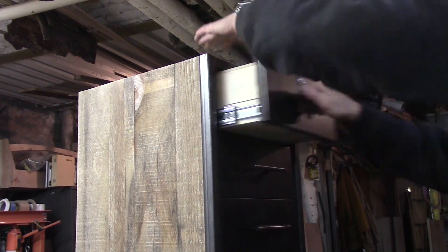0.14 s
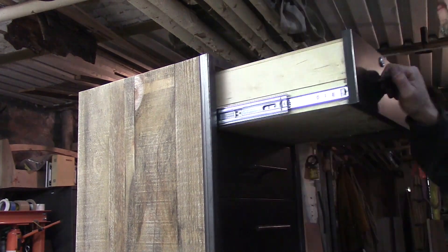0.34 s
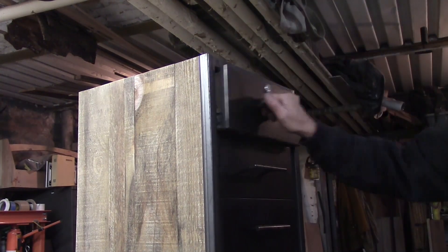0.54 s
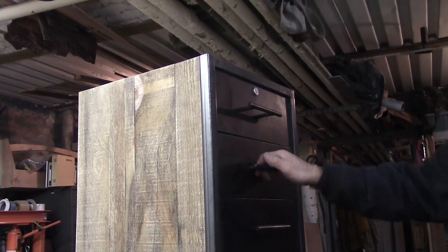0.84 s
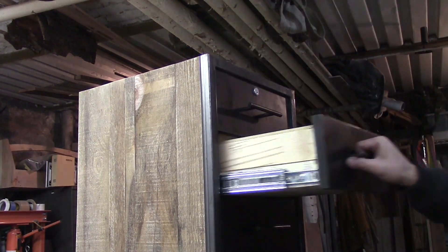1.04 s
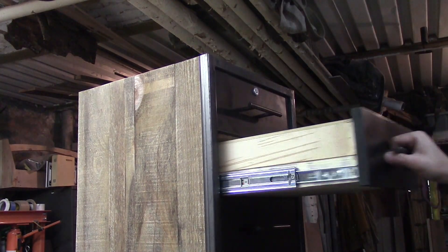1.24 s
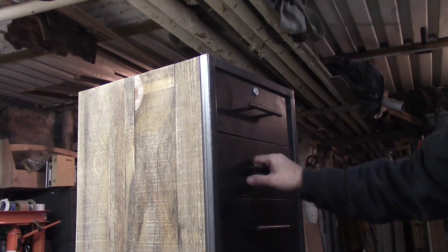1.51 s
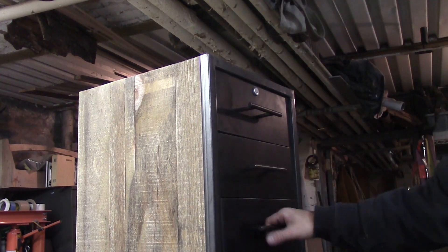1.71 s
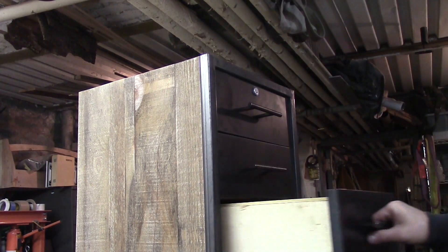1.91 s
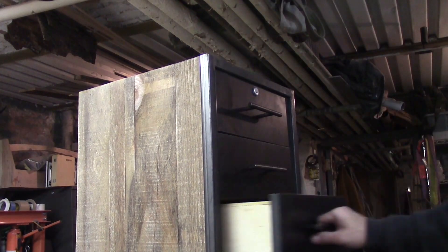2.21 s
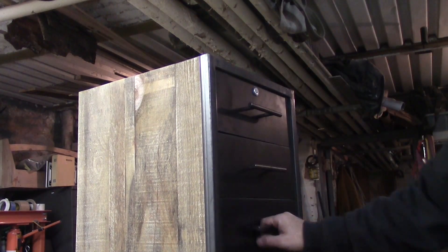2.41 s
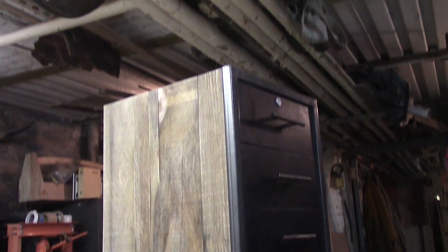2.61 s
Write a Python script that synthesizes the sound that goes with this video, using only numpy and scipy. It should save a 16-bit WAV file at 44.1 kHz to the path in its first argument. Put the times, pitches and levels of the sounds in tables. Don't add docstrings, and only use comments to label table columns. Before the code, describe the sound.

Close-up drawer sliding on metal ball runners: rattly whirr out, click, whirr back, hollow wooden slam, repeated three times with faint hand brushes between, over low shop noise, ending suddenly in duller, quieter room air.

```python
import sys
import numpy as np
from scipy import signal
from scipy.io import wavfile
from scipy.ndimage import uniform_filter1d

SR = 44100
rng = np.random.default_rng(int(sys.argv[2]) if len(sys.argv) > 2 else 0)


def linear_from_db(decibels):
    return 10 ** (np.asarray(decibels, float) / 20)


def store_pcm(level_fs):
    pcm = np.round(np.clip(level_fs, -1, 1) * 32767).astype(np.int16)
    wavfile.write(sys.argv[1], SR, np.atleast_2d(pcm).T)


N = 121275
T = np.arange(N) / SR
BAND_EDGES_HZ = np.geomspace(40, 16800, 23)
BAND_HZ = np.sqrt(BAND_EDGES_HZ[1:] * BAND_EDGES_HZ[:-1])

# start_s, level_db
SLAMS = [
    (0.0, -40.5),
    (0.209, -35.5),
    (0.683, -32.5),
    (1.584, -23),
    (2.091, -43.5),
    (2.461, -25.5),
]
# pitch_hz, level_db per Hz
SHOP = [(30, -26), (100, -17), (320, 0), (1100, -7), (3100, -14), (8000, -24), (16000, -29)]
# pitch_hz, level_db per Hz
CORNER = [(18, -44), (30, -22), (98, -5), (227, -9), (364, -15.5), (600, -14.5), (721, -21), (2750, -29.5),
          (16000, -61)]
SHOP_DB, CORNER_DB = -48.5, -53.5
THUD_RISE_S = 0.0038


def rms_one(x):
    return x / np.sqrt(np.mean(x ** 2) + 1e-20)


def at_hz(points, hz):
    curve_hz, curve_db = np.transpose(points)
    return np.interp(np.log(hz), np.log(curve_hz), curve_db)


def drift(rate_hz):
    r = np.exp(-80 * np.pi * rate_hz / SR)
    noise = rng.standard_normal(N // 40 + 2002)
    slow = signal.lfilter([1], [1, -2 * r, r * r], noise)[2000:]
    return np.interp(np.arange(N) / 40, np.arange(len(slow)), rms_one(slow))


def bank(sources):
    bands = []
    for k, (low, high) in enumerate(zip(BAND_EDGES_HZ, BAND_EDGES_HZ[1:])):
        band_filter = signal.butter(2, [low, high], "band", fs=SR, output="sos")
        bands.append(signal.sosfilt(band_filter, sources[k % 2]))
    return np.array(bands)


def unit_gains(spectrum):
    gains = linear_from_db(at_hz(spectrum, BAND_HZ))
    return gains / np.sqrt(np.sum(gains ** 2 * np.diff(BAND_EDGES_HZ)) / (SR / 2))


def resonance(x, hz, width_hz):
    r = np.exp(-np.pi * width_hz / SR)
    top_gain = np.array([1, 0, -1]) * (1 - r * r) / 2
    return signal.lfilter(top_gain, [1, -2 * r * np.cos(2 * np.pi * hz / SR), r * r], x)


def fading_tail(t, t60, linger_db):
    return linear_from_db(-60 * t / t60) + linear_from_db(linger_db - 60 * 0.25 * t / t60)


def struck(s, db, hz, t60, rise_s):
    out, i = np.zeros(N), int(s * SR)
    t = T[:min(N - i, int(2 * t60 * SR))]
    swell = 1 - np.exp(-(t / rise_s) ** 2)
    out[i:i + len(t)] = linear_from_db(db) * fading_tail(t, t60, -30) * swell * np.sin(2 * np.pi * hz * t)
    return out


def air(spectrum, db):
    return linear_from_db(db + 0.5 * drift(13)) * (unit_gains(spectrum) @ bank(rng.standard_normal((2, N))))


def duck():
    sink_db = np.zeros(N)
    for s, db in SLAMS:
        recovery = np.exp(-np.maximum(T - s, 0) / 0.78)
        sink_db += -1.5 * linear_from_db(db - SLAMS[3][1]) * (T > s) * recovery
    return linear_from_db(sink_db)


def quiet_corner():
    # start_s, level_db, pitch_hz, t60_s
    bump = (2.657, -33, 100, .09)
    s, db, hz, t60 = bump
    dull = signal.butter(6, 6040, fs=SR, output="sos")
    out = signal.sosfilt(dull, air(CORNER, CORNER_DB))
    out = out + struck(s, db, hz, t60, THUD_RISE_S)
    return out + struck(s, db - 9, 3.45 * hz, 0.041, 0.0011)


def hands(bands):
    # middle_s, width_s, level_db
    brushes = [
        (.81, 0.014, -53),
        (0.863, 0.017, -45),
        (1.75, 0.015, -57.5),
    ]
    shape = sum(linear_from_db(db) * np.exp(-.5 * ((T - s) / width) ** 2) for s, width, db in brushes)
    colour = unit_gains([(300, -7), (1500, -8), (5000, -4.0), (15000, -12.5)])
    return shape * linear_from_db(1.6 * drift(40)) * (colour @ bands)


def squeaks():
    # width_ms, level_db, pitch_hz
    squeak_shapes = [(4.1, -38.5, 10000), (10, -39.5, 10000), (2.5, -29, 11000), (5.1, -44, 12400),
                     (1.8, -49, 10000), (6.1, -29, 13000), (3.1, -33.5, 10000)]
    squeak_times = [1.016, 1.034, 1.402, 1.84, 2.14, 2.318, 2.338]
    noise = rng.standard_normal(N) * linear_from_db(3 * drift(150))
    out = np.zeros(N)
    for s, (width_ms, db, hz) in zip(squeak_times, squeak_shapes):
        hiss = resonance(resonance(noise, hz, hz * .25), hz, hz * .25)
        shape = np.exp(-.5 * (1000 * (T - s) / width_ms) ** 2)
        out += linear_from_db(db) * shape * rms_one(hiss)
    return out


def thuds():
    # start_s, peak_db, pitch_hz, t60_s
    knocks = [(0.204, -18, 649, 0.097), (0.229, -15, 504, 0.028), (0.646, -23, 668, 0.05),
              (0.683, -8.5, 295, 0.048), (0.883, -34.5, 365, 0.081), (1.005, -23, 438, 0.028),
              (1.404, -2, 620, 0.022), (1.416, -1.5, 615, 0.052), (1.58, -0.5, 520, 0.012),
              (1.587, -9.5, 290.3, 0.069), (1.726, -26, 500, 0.039), (1.835, -12, 647, 0.022),
              (1.931, -18, 423, 0.099), (2.0821, -0.5, 460, 0.032), (2.32, -16, 577, 0.064),
              (2.34, 5.5, 496, 0.02), (2.361, -6, 584, 0.036), (2.463, -4, 426.5, 0.025),
              (2.49, -20.5, 327, 0.044)]
    # pitch ratio, level_db
    partners = [(1.0, 2), (0.92, -14.5), (0.96, -21), (2.2, -14), (2.4, -23)]
    # start_s, level_db, pitch_hz, t60_s
    rings = [(0.0, -27.5, 340, 0.028), (0.0, -27.5, 89, 0.035), (0.171, -21.5, 368, 0.05),
             (0.207, -11, 1060, 0.051), (0.218, -16.5, 288.3, 0.086), (0.644, -11, 300, .05),
             (0.672, 2.5, 1158, 0.038), (0.679, -6, 888, 0.05), (0.691, -20, 1035, 0.028),
             (0.696, -13, 280.5, 0.11), (0.698, -13.5, 916, 0.069), (0.7, -13, 543, 0.1),
             (0.717, -18, 1225, 0.032), (0.754, -31, 152, 0.091), (1.009, -3, 1300, 0.038),
             (1.172, -25.5, 194, 0.13), (1.447, -8, 381, 0.055), (1.597, -9, 284, 0.062),
             (1.59, -24, 935, 0.048), (1.595, -18, 999, 0.07), (1.596, -28, 526, 0.16),
             (2.09, -8, 907, 0.029), (2.1, -21, 430, 0.027), (2.132, -20, 434, 0.13),
             (2.323, 1.5, 1578, 0.048), (2.461, -13.5, 167.6, 0.065)]
    # pitch_hz, level_db, t60_s
    cabinet_hum = [(284, -0.5, 0.65), (308, -10, 0.28), (146, -11.5, 0.3), (184.5, -6.5, 0.33)]
    out = np.zeros(N)
    for s, db, hz, t60 in knocks:
        for ratio, level_db in partners:
            luck_db, luck_hz = rng.normal(0, 1, 2) * (ratio != 1)
            tone_db = db + level_db + 4.5 + 1.9 * luck_db
            out += struck(s, tone_db, hz * ratio * (1 + 0.05 * luck_hz), t60, THUD_RISE_S)
    for s, db, hz, t60 in rings:
        out += struck(s, db, hz, t60, THUD_RISE_S)
    for s, db in SLAMS:
        for hz, level_db, t60 in cabinet_hum:
            out += linear_from_db(3 * drift(17)) * struck(s, db + level_db, hz, t60, 0.004)
    return out


def clicks(bands):
    # start_s, peak_db, tilt_db per octave, t60_s
    contacts = [(0.1765, -30, 6, 0.14), (0.2055, -12, -2.2, 0.15), (0.4333, -20.5, 0.5, 0.084),
                (0.6428, -4.5, 0.1, 0.15), (0.671, 6.5, 1.5, 0.073), (0.763, -47.5, 18.5, 0.042),
                (0.798, -35.5, 3.5, 0.13), (0.811, -33.5, 3, 0.13), (0.858, -23.5, 5, 0.055),
                (0.8708, -47.5, -8.3, 0.16), (0.978, -26.5, -2, 0.12), (1.0049, -16.5, -1.5, 0.18),
                (1.0133, -20, 8, 0.073), (1.1304, -20.5, 1, 0.21), (1.1709, -4.5, 1.5, 0.061),
                (1.193, -12.5, 2, 0.16), (1.322, -24.5, -2, 0.079), (1.4028, -7, 6, 0.061),
                (1.4149, 0.5, 1.5, 0.14), (1.5395, -14.5, 0.5, 0.055), (1.57, -8.5, -4.3, 0.0095),
                (1.5784, 5, 1, 0.085), (1.6794, -60.5, 2, 0.023), (1.7336, -27.5, 8, 0.04),
                (1.761, -22.5, 3, 0.038), (1.8366, -17.5, -1, 0.16), (2.0796, -13, 2, 0.15),
                (2.14, -43, 15, 0.16), (2.1965, -18, 0, 0.1), (2.3234, -1, 0.5, 0.16),
                (2.459, 4, 1.6, 0.062)]
    # pitch_hz, level_db per Hz
    click_body = [(59, -38), (100, -25), (373, 2), (1170, 1.5), (2130, -12.5), (2990, -10), (5080, -21),
                  (13200, -33.5), (16000, -40)]
    out, octaves = np.zeros(N), np.log2(BAND_HZ / 3000)[:, None]
    body = unit_gains(click_body)[:, None]
    bands = bands * linear_from_db(3.1 * drift(100))
    for s, db, tilt_db, t60 in contacts:
        i = int(s * SR)
        t = T[:min(SR // 4, N - i)]
        rattle = linear_from_db(-60 * t / (t60 * 2 ** (-0.19 * octaves))) * (1 - np.exp(-t / 0.0014))
        crack = linear_from_db(5) * np.exp(-t / .0015) * (octaves > -1)
        linger = linear_from_db(-27.5 - 60 * 0.25 * t / t60)
        gains = body * linear_from_db(db - 9.5 + tilt_db * octaves)
        out[i:i + len(t)] += np.sum(gains * (rattle + crack + linger) * bands[:, i:i + len(t)], axis=0)
    return out


def rolling():
    # time_s, level_db
    strokes = [
        [(.163, -48), (.19, -31), (.225, -22), (.3, -27), (.375, -32), (.425, -62)],
        [(.425, -69), (.45, -39), (.5, -22), (.57, -25.5), (.64, -30), (.68, -26.5)],
        [(.96, -54.5), (1.01, -28), (1.07, -28.5), (1.15, -27), (1.255, -31), (1.3, -56)],
        [(1.3, -53), (1.335, -28.5), (1.39, -21), (1.5, -28.5), (1.57, -31.5), (1.6, -37)],
        [(1.805, -50.5), (1.84, -23), (1.99, -26.5), (2.05, -33), (2.12, -35.5), (2.17, -58)],
        [(2.17, -55), (2.2, -27.5), (2.255, -17), (2.31, -21), (2.44, -38.5), (2.48, -23.5)],
    ]
    # pitch_hz, level_db per Hz
    roll_body = [(100, -41.5), (200, -42), (420, -7.5), (1150, -4), (2500, -3), (3600, -9.5), (5000, -14.5),
                 (16000, -32.5)]
    # pitch_hz, width_hz, level_db
    rails = [
        [(442, 28, -8), (500, 33, 9), (622, 56, 4), (697, 40, 6.5), (846, 51, 1), (1160, 41, 9),
         (1300, 160, -4.5), (1907, 55, -1), (2540, 120, -10.5), (3714, 88, 3.5)],
        [(295, 35, 9), (460, 180, 4.5), (602, 69, 4), (760, 120, 5), (900, 43, -1), (1070, 25, 10),
         (1334, 70, 1.5), (1555, 21, 6), (2480, 180, -6), (2880, 140, 3.5)],
        [(396, 40, 6.5), (500, 50, -2), (579, 34, 2.5), (874.5, 27, 9.5), (961, 33, 3.5), (1165, 92, 6),
         (1576, 35, 1.5), (2068, 85, 3), (2646, 160, -7), (2770, 60, -1)],
    ]
    drawer_changes = [.85, 1.7]
    # boom_db near 550 Hz, presence_db near 2.5 kHz, sizzle_db above 7 kHz
    stroke_colour = [(-0.5, -2, -2.5), (2, -1, 0.2), (1.3, -3.7, -4.1), (0, -1.5, 1.5), (1.3, -1.3, -9),
                     (-2, 1, -0.5)]

    speeds = [np.interp(T, *np.transpose(rows), left=-90, right=-90) for rows in strokes]
    speed_db = uniform_filter1d(np.max(speeds, axis=0), size=200)

    sizes = linear_from_db(4.5 * np.minimum(rng.exponential(1, (2, N)), 4)) * rng.choice([-1, 1], (2, N))
    knocks = sizes * (rng.random((2, N)) < 1100 / SR)
    grains = rms_one(knocks) + 1.07 * rng.standard_normal((2, N))

    drawer = np.searchsorted(drawer_changes, T)
    wander = [linear_from_db(1.8 * drift(9.8)) for _ in rails[0]]
    peaks = np.zeros((2, N))
    for d, rows in enumerate(rails):
        for k, (hz, width_hz, db) in enumerate(rows):
            level = (-1) ** k * linear_from_db(db) * wander[k] * (drawer == d)
            peaks += level * resonance(grains, hz, width_hz)
    bands = bank(grains * .5 + linear_from_db(-1.5) * peaks)

    together = drift(19)
    stroke = np.searchsorted([rows[0][0] for rows in strokes[1:]], T)
    boom_db, presence_db, sizzle_db = np.transpose(stroke_colour)[:, stroke]
    out = np.zeros(N)
    for band, hz, gain in zip(bands, BAND_HZ, unit_gains(roll_body)):
        tilt_db = 0.0486 * (speed_db + 11.5) * np.log2(hz / 1500)
        colour_db = boom_db * np.exp(-np.log2(hz / 550) ** 2)
        colour_db = colour_db + presence_db * np.exp(-np.log2(hz / 2500) ** 2)
        colour_db = colour_db + sizzle_db / (1 + (7000 / hz) ** 4)
        patchy_db = 1.5 * (.5 * together + drift(3.9))
        out += gain * band * linear_from_db(tilt_db + colour_db + patchy_db)
    out = signal.sosfilt(signal.butter(4, 242, "high", fs=SR, output="sos"), out)
    return out * linear_from_db(speed_db + 3.5)


def room(x):
    t = T[:SR // 2]
    t60_s = np.array([[0.14], [.03]])
    tails = rng.standard_normal((2, len(t))) * linear_from_db(-60 * t / t60_s) * (t > .004)
    tails[0] = signal.lfilter(*signal.butter(1, 1880, fs=SR), tails[0])
    tails /= np.sqrt(np.sum(tails ** 2, axis=1, keepdims=True))
    return signal.fftconvolve(x[None], tails, axes=1)[:, :N]


def scene():
    bands = bank(rng.standard_normal((2, N)))
    near = rolling() + clicks(bands) + hands(bands) + thuds() + squeaks()
    echoes, difference = room(near)
    mic_low_cut = signal.butter(4, 118, "high", fs=SR, output="sos")
    near = signal.sosfilt(mic_low_cut, near + linear_from_db(-17) * echoes)

    before = np.clip((2.522 - T) / 0.0038, 0, 1)
    after = 1 - before
    middle = before * (near + duck() * air(SHOP, SHOP_DB)) + after * quiet_corner()
    wide_shop = linear_from_db(SHOP_DB) * (unit_gains(SHOP) @ bands)
    wide_corner = linear_from_db(CORNER_DB) * (unit_gains(CORNER) @ bands)
    side = before * linear_from_db(-42) * difference + linear_from_db(-17) * (before * wide_shop + after * wide_corner)
    return np.array([middle + side, middle - side])


def band_limit(x):
    return signal.sosfilt(signal.butter(12, 16960, fs=SR, output="sos"), x)


def record(dry):
    limited = dry / (1 + (dry / .9) ** 4) ** .25
    held = signal.lfilter(*signal.butter(2, 60, "high", fs=SR), limited)
    top_cut = signal.cheby2(10, 60, 17200, fs=SR, output="sos")
    return band_limit(signal.sosfilt(top_cut, held))


dry = scene()
out = record(dry)
store_pcm(out)
```